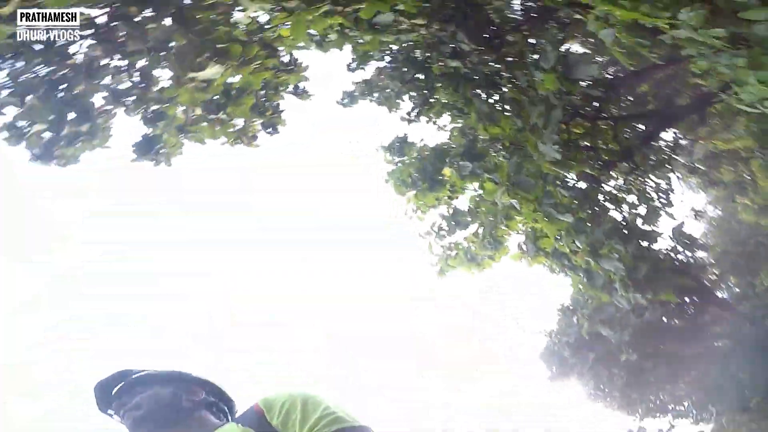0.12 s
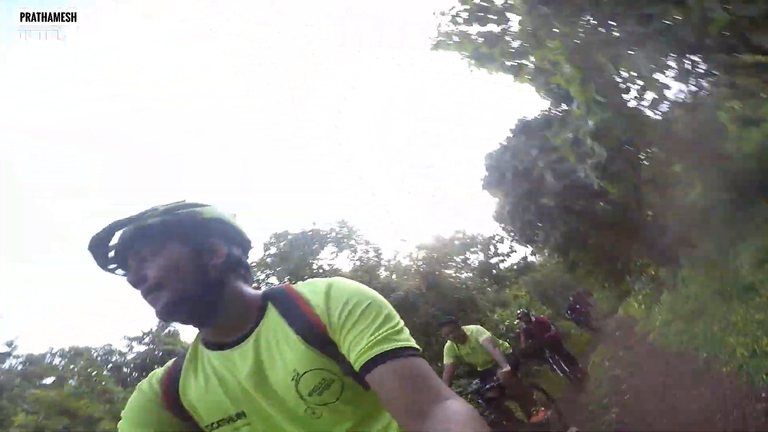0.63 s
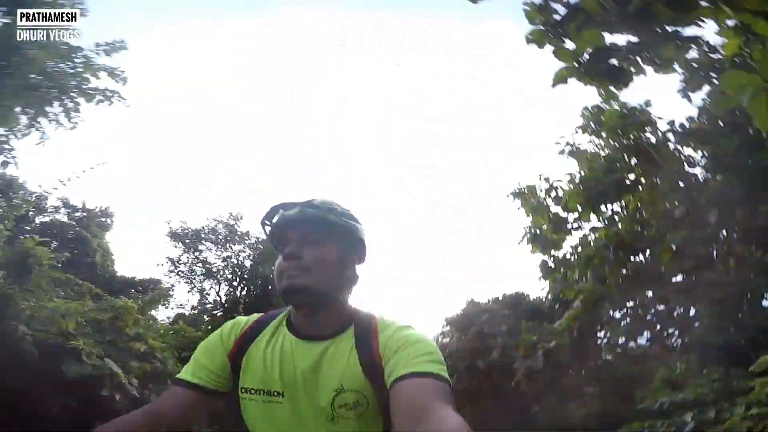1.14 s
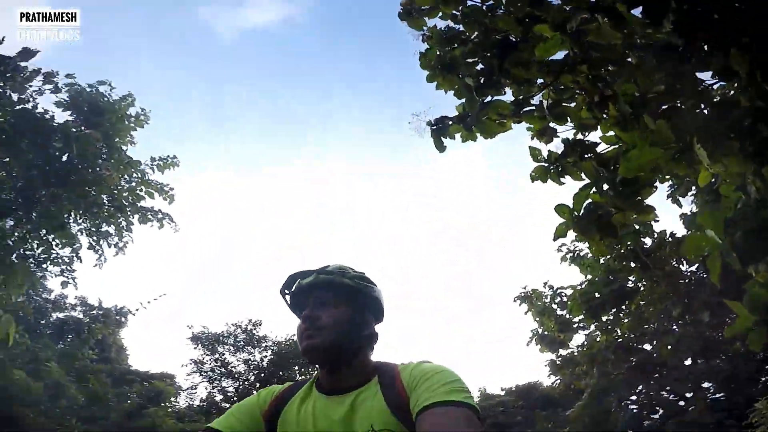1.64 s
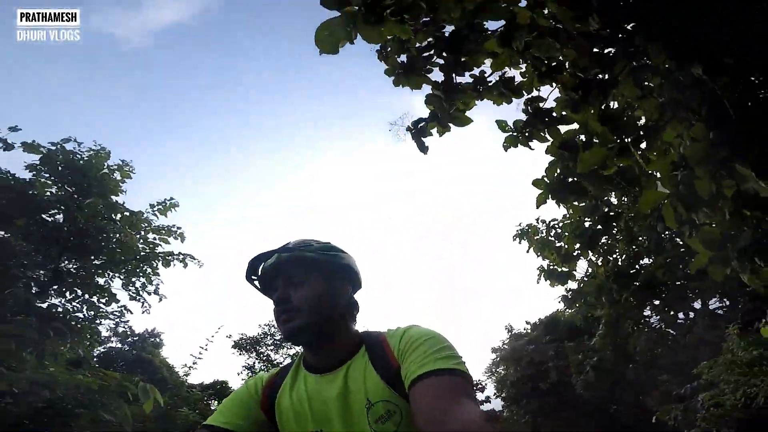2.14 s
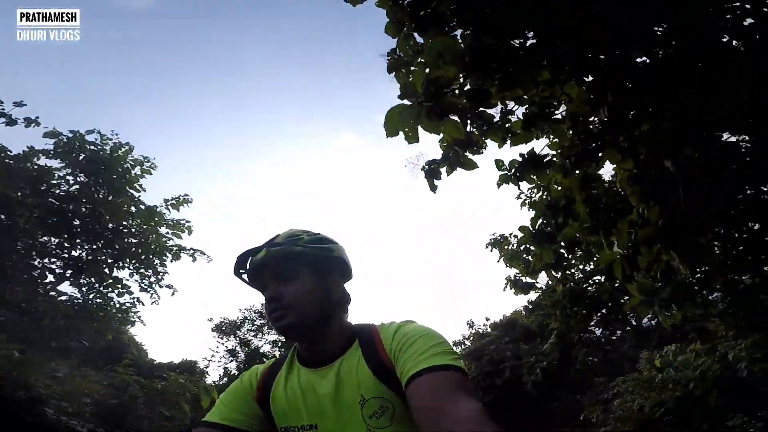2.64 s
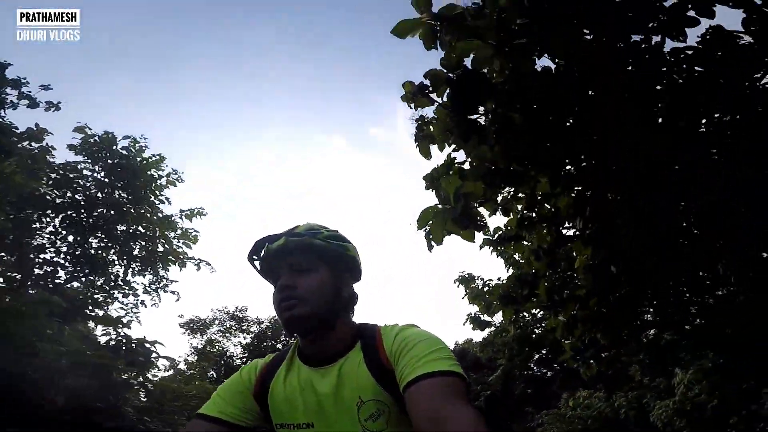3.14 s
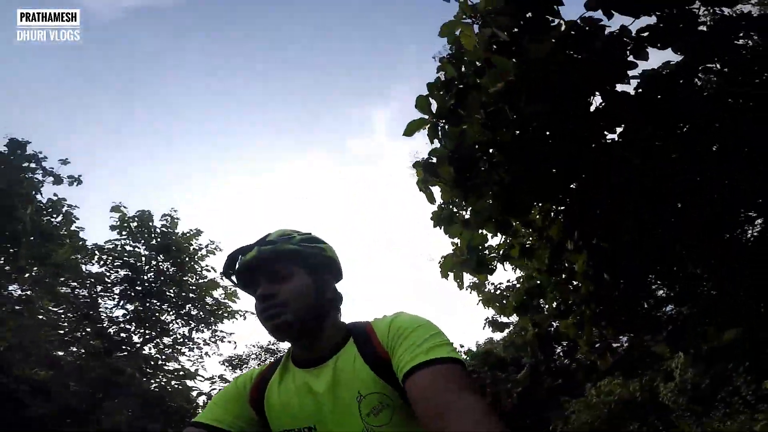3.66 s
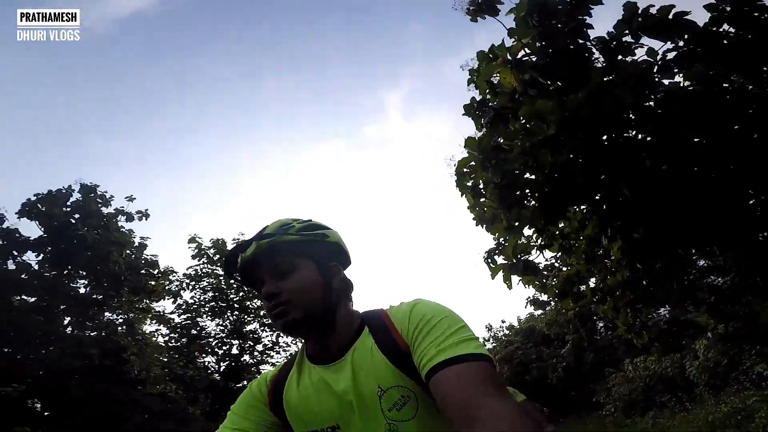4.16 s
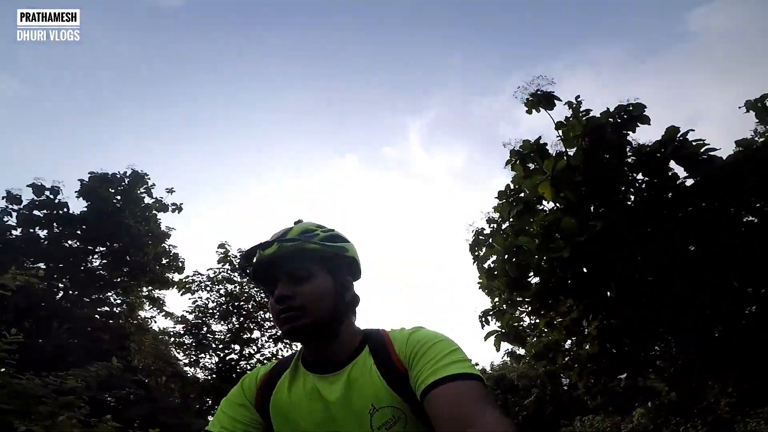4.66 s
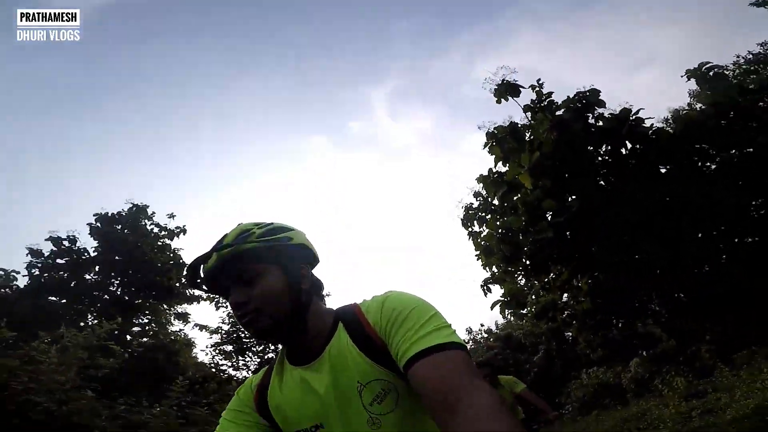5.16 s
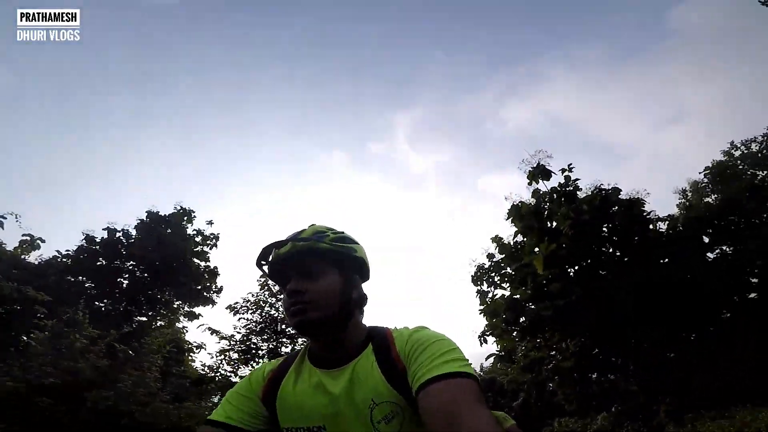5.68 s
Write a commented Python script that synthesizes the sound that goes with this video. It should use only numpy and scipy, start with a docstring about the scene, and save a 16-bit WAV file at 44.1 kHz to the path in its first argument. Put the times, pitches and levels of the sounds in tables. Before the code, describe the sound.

A handlebar-mounted camera clatters and thuds irregularly as a bike bumps along a trail, after brief scraping by a hand, with wind rumbling.

```python
"""Bicycle handlebar on a rough trail

A small camera clamped to the handlebar of a bicycle on a rough dirt trail. Jolts strike damped modes of clamp and
plastic housing and move the two microphones largely in opposite sense; filtered noise makes the wind on the ports;
dense slips make things drag along the housing. Far off, noise bands hiss as an insect chorus and gliding tones
chirp as a bird. Gain control ducks after the loudest knocks."""
import sys
import numpy as np
from scipy import signal
from scipy.fft import rfft, irfft
from scipy.io import wavfile
from scipy.ndimage import uniform_filter1d, minimum_filter1d

SR = 44100
rng = np.random.default_rng(int(sys.argv[2]) if len(sys.argv) > 2 else 0)


def volts_from_decibels(level):
    """Turn decibel levels (scalar or array-like) into linear amplitude factors."""
    exponent = np.asarray(level, float) / 20
    return 10 ** exponent


def log_audio(samples):
    """Write samples as a 16-bit WAV file to the path given in sys.argv[1]."""
    # one column per channel
    frames = np.atleast_2d(samples).T
    # limit to full scale, then quantise
    limited = np.clip(frames, -1, 1)
    pcm = np.round(limited * 32767).astype(np.int16)
    wavfile.write(sys.argv[1], SR, pcm)


N = 255780
TIME = np.arange(N) / SR
SHAPE_TIME = np.arange(1400) / SR  # time within one blow, s


def curve(table):
    """Linear interpolation: columns of a table joined by straight lines in time."""
    s, *columns = np.transpose(table)
    return np.array([np.interp(TIME, s, c) for c in columns])


def unit(x):
    """Normalisation to an rms of 1."""
    return x / np.sqrt(np.mean(x ** 2))


def even(shape):
    """Energy normalisation: every force shape carries the same energy."""
    return shape / np.sqrt(np.sum(shape ** 2, -1, keepdims=True))


def walk(rate):
    """Smoothed random steps: levels held 1 / rate s and slewed twice, rms 1."""
    hold = int(SR / rate)
    steps = np.repeat(rng.standard_normal(N // hold + 1), hold)
    return unit(uniform_filter1d(uniform_filter1d(steps, hold), hold)[:N])


def soften(x, hz):
    """Steep low-pass: a contact takes time, so it drives little above hz."""
    return signal.sosfilt(signal.butter(3, hz, fs=SR, output="sos"), x)


def ring(force, modes, alike_hz=2900):
    """Modal superposition at both microphones; force holds a shared row and one for the right side alone."""
    out = np.zeros((2, N))
    for hz, t60, db, pan_db, lag in modes:
        pole = np.exp(2j * np.pi * hz / SR - np.log(1000) / (t60 * SR))
        own = 1 / (1 + (alike_hz / hz) ** 3)  # short waves reach the two sides by different paths
        right_force = np.sqrt(1 - own) * force[0] + np.sqrt(own) * force[1]
        left, right = signal.lfilter([1], [1, -pole], [force[0], right_force])
        right = right * np.exp(-1j * lag)
        out += volts_from_decibels(db) * np.imag([volts_from_decibels(pan_db / 2) * left, volts_from_decibels(-pan_db / 2) * right])
    return out


def blows(at_s, db, shape):
    """Superposition of impulses: a force shape (blows x 2 x samples) laid at every time."""
    force = np.zeros((2, N + SR))
    at = (at_s * SR).astype(int)[:, None] + np.arange(shape.shape[-1])
    for side in range(2):
        np.add.at(force[side], at, volts_from_decibels(db)[:, None] * shape[:, side])
    return force[:, :N]


def whistles(table, waver_hz):
    """Frequency modulation: short tones that glide, their pitch unsteady by waver_hz."""
    out = np.zeros(N)
    for s, length, from_hz, to_hz, db in table:
        u = np.clip((TIME - s) / length, 0, 1)
        cycles = np.cumsum(from_hz + (to_hz - from_hz) * u + waver_hz) / SR
        swell = np.sqrt(np.clip(4 * u * (1 - u), 0, 1))
        out += volts_from_decibels(db) * swell * np.sin(2 * np.pi * cycles)
    return out


# wind on the ports: (time [s], level of the two ports' mean [dB], left minus right [dB])
WIND = [(0.0, -37.5, 4.5), (0.05, -30.5, -2), (0.14, -44, -2), (0.31, -26, -5), (0.48, -47.5, 0),
        (0.56, -27, 5.5), (0.76, -34.5, 5.5), (0.93, -21.5, 2.5), (0.97, -28.5, 0.5), (1.42, -23, 4.5),
        (1.48, -32.5, 2), (1.71, -20.5, 2.5), (1.79, -30, 5), (2.81, -26, 4), (2.86, -26.5, 3),
        (3.0, -24, 7), (3.18, -29.5, 6), (3.89, -27.5, -1), (4.7, -33.5, 1.5), (5.09, -24.5, 0),
        (5.15, -37.5, 2.5), (5.19, -28, 5), (5.8, -26.5, 3.5)]
# spectral density of the wind: (frequency [Hz], density [dB per Hz])
WIND_COLOUR = [(19, -22), (48, -8.5), (70, 0), (100, -4), (150, -9), (220, -32.5), (420, -34), (900, -58.5),
               (3000, -79)]
# low modes of the clamp: (frequency [Hz], t60 [s], level [dB], left minus right [dB], lag of the right [rad])
CLAMP_MODES = [(128.9, .2, -0.5, 4.5, 3.2), (175.65, 0.36, 0, 4.5, 3.37)]
# low sway of the handlebar: (frequency [Hz], t60 [s], level [dB], left minus right [dB], lag of the right [rad])
BAR_MODES = [(70.6, 0.13, -1, 5, 2.87)]


def wind():
    """Turbulent pressure: low buffeting, partly opposite on the two ports, also shaking clamp and handlebar."""
    hz, db = np.transpose(WIND_COLOUR)
    bins_hz = np.arange(N // 2 + 1) * SR / N
    colour = volts_from_decibels(np.interp(np.log(bins_hz + 1), np.log(hz), db))
    a, b = (unit(irfft(rfft(rng.standard_normal(N)) * colour, N)) for _ in range(2))
    opposite = 0.6  # correlation of the ports, taken negative
    ports = np.array([a, np.sqrt(1 - opposite ** 2) * b - opposite * a])

    level_db, pan_db = curve(WIND)
    flutter_db = 3.5 * walk(18) + 1.95 * np.array([walk(7), walk(7)])
    gusts = volts_from_decibels(level_db + np.array([pan_db, -pan_db]) / 2 + flutter_db)

    shake = unit(ring(soften(rng.standard_normal((2, N)), 230) * gusts.mean(0), CLAMP_MODES))
    sway_force = soften(rng.standard_normal((2, N)), 130) * volts_from_decibels(level_db + 5 * walk(7))
    sway = ring(sway_force, BAR_MODES)
    sway = sway * gusts.mean() / sway.std()
    return gusts * ports / ports.mean(0).std() + volts_from_decibels(3.0) * sway + volts_from_decibels(-34.5) * shake


# deep heave of the air on the ports, below the buffeting: (time [s], level [dB])
HEAVE = [(0.0, -54), (0.23, -39), (0.76, -47), (0.81, -28), (1.19, -27), (1.45, -16.5), (1.5, -18.5),
         (1.57, -23), (2.44, -34), (3.1, -22.5), (3.13, -42), (3.39, -36), (3.44, -17.5), (3.54, -43.5),
         (4.07, -27.5), (4.13, -52), (4.36, -23.5), (4.41, -46.5), (5.06, -22.5), (5.17, -34), (5.78, -32),
         (5.8, -44.5)]


def heave():
    """Infrasonic-to-low pressure swells: narrow-band noise, partly opposite on the two ports."""
    band = signal.butter(2, [18, 52], "band", fs=SR, output="sos")
    a, b = signal.sosfilt(band, rng.standard_normal((2, N)))
    ports = np.array([a + 1.23 * b, a - 1.1 * b])
    return volts_from_decibels(curve(HEAVE)) * ports / a.std()


# insect chorus, its level sinking in steps and partly recovering: (time [s], level [dB])
CHORUS = [(0.0, -63.5), (0.76, -53.5), (1.74, -67.5), (2.91, -66), (3.16, -73.5), (3.81, -77), (4.3, -85),
          (5.09, -73.5), (5.8, -75)]
# its hissing bands: (centre frequency [Hz], width [Hz], level [dB])
CHORUS_BANDS = [(3757, 620, -5.5), (6150, 2900, -8.5), (7580, 1000, -3), (9040, 1600, -14)]


def chorus():
    """Incoherent summation: many insects blur to hissing bands that throb a little."""
    out = 0
    for hz, width, db in CHORUS_BANDS:
        band = signal.butter(3, [hz - width / 2, hz + width / 2], "band", fs=SR, output="sos")
        hiss = unit(signal.sosfilt(band, rng.standard_normal((2, N))))
        out = out + volts_from_decibels(db + 3.0 * walk(55)) * hiss
    return volts_from_decibels(curve(CHORUS)) * out


# drags along the housing, first by a hand, later perhaps by a cable: (start [s], length [s], level [dB])
STROKES = [(0.029, 0.046, -37.5), (0.107, 0.034, -32.5), (0.145, 0.16, -22.5), (0.306, 0.08, -31.5),
           (0.387, 0.2, -47), (0.552, 0.04, -24), (0.605, 0.15, -45.5), (0.734, 0.063, -34.5),
           (0.812, 0.041, -26.5), (0.862, 0.39, -47.5), (1.014, 0.018, -22), (1.128, 0.032, -32),
           (1.672, 0.13, -36.5), (1.84, 0.15, -43), (3.422, 0.089, -38), (4.057, 0.025, -21.5),
           (4.314, 0.086, -45), (4.964, 0.13, -44), (5.332, 0.13, -39.5)]
STROKE_EDGE_S, HAND_OFF_S = 0.024, 0.95
CHATTER_DB, CHATTER_FADE_S, CHATTER_FLOOR_DB = -26, 0.021, -51  # loose parts buzz on after each knock


def rubbing():
    """Stick-slip friction on the four mode sets: dense fine slips, and small loose ticks once the hand lets go."""
    drag = 0
    for s, length, db in STROKES:
        inside_s = np.minimum(TIME - s, s + length - TIME)
        drag = drag + volts_from_decibels(db) * np.clip(inside_s / STROKE_EDGE_S + 0.5, 0, 1)
    chatter = 0
    for s, crack_db, *_ in KNOCKS:
        fade = (TIME > s) * np.exp(-np.abs(TIME - s) / CHATTER_FADE_S)
        chatter = chatter + volts_from_decibels(crack_db + CHATTER_DB) * fade

    slips = rng.standard_normal((2, N)) * volts_from_decibels(3.67 * walk(300))
    tick_db = 13.5 + 5 * np.minimum(rng.exponential(size=N), 1.8)
    ticks = (rng.random(N) < 200 / SR) * (TIME > HAND_OFF_S) * volts_from_decibels(tick_db)  # 200 per second on average
    rough = slips + ticks * rng.standard_normal((2, N))
    friction = (drag + chatter) * rough + volts_from_decibels(CHATTER_FLOOR_DB) * slips
    # (level dB, low-pass Hz) of the force on shell, bright, thud and clamp modes
    drives = [(-27.5, 2000), (-39.5, 7100), (-32.5, 500), (-29.5, 290)]
    return np.array([volts_from_decibels(db) * soften(friction, hz) for db, hz in drives])


# knocks: (time [s], crack [dB], brightness above 1.7 kHz against the crack [dB], thud [dB])
KNOCKS = [(0.105, -30.5, -29, -33.5), (0.28, -23.5, -19, -27.5), (0.298, -24, -22, -53),
          (0.362, -45, -8.5, -35), (0.547, -31.5, -34, -33), (0.57, -32.5, -17, -28.5),
          (0.832, -34, -21, -35), (0.865, -36, -16.5, -34), (0.926, -26, -16, -26),
          (1.007, -31, -34, -23.5), (1.017, -14, -19.5, -24), (1.03, -40, -21, -22.5),
          (1.051, -46, -16, -31.5), (1.133, -36.5, -23, -34.5), (1.149, -30.5, -20.5, -32.5),
          (1.183, -26, -26, -19.5), (1.289, -28.5, -15, -38), (1.424, -42, -12, -21.5),
          (1.435, -16.5, -16, -42), (1.473, -9, -14.5, -10.5), (1.548, -56, -7, -32),
          (1.597, -30.5, -27, -30), (1.624, -21, -27.5, -59), (1.68, -38, -27, -21),
          (1.696, -28, -19.5, -29), (1.726, -12, -31, -14), (1.745, -8, -20, -14), (1.759, -7.5, -17, -8),
          (1.827, -25.5, -18, -32), (1.926, -38.5, -32, -28), (1.978, -27, -22, -25),
          (2.197, -43.5, -25, -28), (2.252, -34.5, -23, -56), (2.412, -18, -19.5, -30),
          (2.441, -17, -13.5, -17), (2.471, -36, -26, -26), (2.523, -30.5, -16, -41),
          (2.635, -26, -19.5, -17), (2.661, -33, -25, -23), (2.844, -11, -19.5, -6),
          (2.946, -32, -18.5, -44), (3.081, -32, -14, -31.5), (3.101, -15.5, -19.5, -19),
          (3.144, -49, -35, -27), (3.205, -15, -9.5, -15), (3.214, -27, -39, -22.5),
          (3.226, -28.5, -17, -26), (3.239, -29.5, -19, -26), (3.306, -17, -14, -19.5),
          (3.344, -27.5, -25, -21.5), (3.358, -31.5, -17, -26.5), (3.384, -29.5, -16.5, -37),
          (3.409, -52.5, -9, -34), (3.436, -24.5, -34.5, -24.5), (3.461, -23.5, -15, -20),
          (3.47, -24, -16, -22.5), (3.492, -18.5, -17.5, -17.5), (3.547, -23, -20, -14.5),
          (3.564, -27.5, -19.5, -30), (3.659, -28.5, -22, -26), (3.713, -31.5, -19, -23),
          (3.726, -23, -23, -17.5), (3.81, -22.5, -11, -23), (3.821, -22.5, -28, -30),
          (3.859, -18, -18.5, -22.5), (3.9, -28, -19, -26), (3.916, -24, -17.5, -21),
          (4.017, -44, -15, -29.5), (4.025, -31, -25, -30), (4.057, -18, -20.5, -15),
          (4.074, -11, -9, -9.5), (4.086, -22, -15, -36), (4.099, -20, -16.5, -17.5),
          (4.141, -25, -17.5, -29), (4.163, -29, -26, -25.5), (4.176, -33.5, -20, -24.5),
          (4.216, -22, -19, -27), (4.243, -48.5, -14, -41), (4.3, -28.5, -19, -34),
          (4.333, -37, -25, -29.5), (4.347, -25.5, -14, -26.5), (4.361, -25, -17.5, -19),
          (4.373, -29.5, -32, -28), (4.393, -20, -20.5, -24.5), (4.439, -43, -27, -28.5),
          (4.569, -28, -19.5, -21.5), (4.603, -39.5, -1.5, -45), (4.74, -44, -13, -60),
          (4.801, -23.5, -18.5, -21), (4.867, -20, -19, -26), (4.878, -25.5, -21, -21.5),
          (4.939, -24.5, -22, -25), (4.982, -26, -26, -23.5), (5.001, -21.5, -14.5, -48),
          (5.041, -53, -18, -29), (5.075, -25, -23, -25.5), (5.088, -23, -46, -27.5),
          (5.101, -14, -16.5, -17), (5.28, -27.5, -19, -19), (5.332, -21.5, -19.5, -25.5),
          (5.367, -27.5, -28, -25), (5.385, -16, -13.5, -13.5), (5.436, -28.5, -21, -24),
          (5.444, -30, -19.5, -32), (5.455, -34, -24, -24), (5.485, -17, -15.5, -18.5),
          (5.531, -37.5, -27, -28.5), (5.678, -33.5, -21.5, -27.5), (5.774, -16.5, -20.5, -17)]
# jolts that set the clamp swinging: (time [s], level [dB])
SWINGS = [(0.025, -30), (0.116, -21.5), (0.161, -19.5), (0.258, -13.5), (0.379, -16), (0.551, -7.5),
          (0.836, -20), (0.925, -14.5), (1.021, -16), (1.128, -17.5), (1.182, -18), (1.426, -18.5),
          (1.48, -19), (1.598, -17.5), (1.996, -22), (2.446, -14.5), (2.477, -24.5), (2.633, -23.5),
          (3.105, -20), (3.21, -15.5), (3.314, -16), (3.473, -19), (3.552, -19), (3.738, -13),
          (3.814, -17.5), (3.861, -19), (4.019, -18.5), (4.061, -18.5), (4.224, -17.5), (4.36, -15.5),
          (4.982, -17.5), (5.079, -20.5), (5.283, -16), (5.361, -14.5)]


def knocks():
    """Impact excitation of the four mode sets: a hard contact with a gritty tail, then a softer push behind it."""
    at, crack_db, bright_db, thud_db = np.transpose(KNOCKS)
    swing_at, swing_db = np.transpose(SWINGS)
    t = SHAPE_TIME
    grit = rng.standard_normal((len(KNOCKS), 2, len(t))) * np.minimum(t / 0.00072, 1)
    rebounds = rng.random((len(KNOCKS), 1, len(t))) < 420 / SR  # loose parts land again just after
    tail = (volts_from_decibels(-24.5) + volts_from_decibels(3.5) * rebounds) * np.exp(-t / 0.0084)
    contact = grit * (np.exp(-t / 0.0021) + tail)
    contact = contact + volts_from_decibels(6.5) * (t > 0) * np.exp(-t / 0.0001)  # the first touch is a clean edge

    push = np.ones((1, 2, 1)) * t * np.exp(-t / 0.00052)
    push = push / push.sum(-1, keepdims=True)
    shove = volts_from_decibels(9.5) * push + volts_from_decibels(-6.5) * even(soften(grit * np.exp(-t / 0.0079), 640))

    spark_gain = volts_from_decibels(-4.0 + 0.5 * bright_db)[:, None, None]  # brighter knocks start more sharply
    spark = spark_gain * even(grit * np.exp(-t / 0.00013))
    crack = blows(at, crack_db, even(soften(contact, 1930)))
    snap = blows(at, crack_db + bright_db, even(soften(contact, 4100)) + spark)
    thud = blows(at + 0.0015, thud_db, shove)
    swing = blows(swing_at, swing_db, volts_from_decibels(8.5) * soften(push, 400))
    return np.array([volts_from_decibels(-3.5) * crack, volts_from_decibels(4.5) * snap, thud, swing])


# modes of clamp and housing, from dull to bright:
# (frequency [Hz], t60 [s], level [dB], left minus right [dB], lag of the right [rad])
THUD_MODES = [(267.5, 0.014, 5.5, 6.5, 2.14), (326, 0.021, -3.5, 8, 4.33), (388.3, 0.076, -10, 1.5, 2.89),
              (555, 0.029, -2.5, -1, 2.44)]
SHELL_MODES = [(662, 0.048, -4, -3.5, 3.25), (835, 0.0027, -16.5, -14.5, 2.83),
               (899, 0.023, 1.5, -1, 3.292), (1139, 0.018, 4, 0.5, 2.66), (1600, 0.0071, -7.5, 22, 2.2)]
BRIGHT_MODES = [(1768, 0.016, 4.5, 2.5, 3.17), (2252, 0.012, 2.5, 2, 4.24), (2630, 0.0042, -9.5, 23.5, 10),
                (3000, 0.012, -10.5, 1, 4.5), (3680, 0.0016, -0.5, 9.5, 14), (5870, 0.0014, 4, -7.5, 5.07),
                (6700, 0.0012, 4.5, -6, 3.03)]


def housing():
    """Forced modal vibration: knocks and rubbing drive the same modes of clamp and housing."""
    mode_sets = [SHELL_MODES, BRIGHT_MODES, THUD_MODES, CLAMP_MODES]
    return sum(ring(force, modes) for force, modes in zip(knocks() + rubbing(), mode_sets))


# resonances that slide while something drags along the housing:
# (start [s], length [s], from [Hz], to [Hz], level [dB])
SLIDES = [(0.16, 0.11, 1900, 2000, -31.5), (0.247, .06, 2300, 2500, -34), (0.144, 0.14, 3020, 3080, -43),
          (0.16, 0.082, 540, 730, -27), (0.135, 0.14, 630, 720, -29.5), (0.27, 0.082, 2000, 1700, -44),
          (0.1, 0.07, 390, 390, -27.5), (0.251, 0.164, 390, 412, -25.5), (.14, .14, 5780, 5820, -51),
          (0.555, 0.046, 2200, 2520, -33.5), ]
SLIDE_WIDTH = 0.056  # low-pass of the roughness, as a share of the starting pitch


def slides(tremble):
    """Amplitude modulation by noise: each gliding tone roughens into a narrow band."""
    out = np.zeros(N)
    for row in SLIDES:
        from_hz = row[2]
        roughness = 0.5 + unit(soften(rng.standard_normal(N), SLIDE_WIDTH * from_hz))
        out += whistles([row], 0.0297 * from_hz * tremble) * roughness
    return out


# chirps of a bird: (start [s], length [s], from [Hz], to [Hz], level [dB])
CHIRPS = [(.612, 0.041, 3990, 3380, -42.5), (.695, 0.035, 4000, 3380, -46.5), (.803, 0.02, 3930, 3630, -51),
          (.88, 0.018, 3880, 3470, -50), (1.233, 0.016, 3900, 3600, -55), (1.31, 0.021, 3900, 3620, -51),
          (1.392, 0.016, 3880, 3680, -49.5)]
CHIRP_WAVER_HZ = 45


def bird(tremble):
    """Frequency-swept tones through the air, unequal in level and arrival time at the two microphones."""
    chirps = whistles(CHIRPS, CHIRP_WAVER_HZ * tremble) * volts_from_decibels(1.8 * walk(150))
    return np.array([chirps / 2, np.roll(chirps, 3)])  # the right is 3 samples later


# heavy bumps that flex the mount; where it is struck sets the pitch: (time [s], level [dB], flex [Hz])
BUMPS = [(0.865, -19, 390), (1.02, -15, 1130), (1.033, -16, 249), (1.438, -11, 1096), (2.412, -16.5, 1120),
         (3.144, -25, 405), (4.394, -20, 930), (0.92, -19, 416), (1.005, -16, 311), (1.138, -12, 410),
         (1.182, -20, 406), (1.241, -16.5, 396), (1.425, -10.5, 418), (1.474, -11.5, 358),
         (1.599, -13.5, 417), (1.921, -18.5, 400), (1.978, -8.5, 271), (2.636, -12, 249),
         (2.848, -2.5, 261), (3.205, -20.5, 317), (3.308, -15, 370), (3.549, -9.5, 298), (3.723, -14, 315),
         (3.811, -12, 563), (3.861, -15, 536), (4.057, -19, 229), (4.219, -15, 543), (4.348, -11.5, 391),
         (4.571, -15.5, 277), (4.982, -12.5, 406), (5.385, -12, 378), (5.487, -10, 278),
         (5.776, -14.5, 273)]
BUMP_CYCLES = 2.8  # swings until the flex has faded to about a third


def bumps():
    """Damped oscillation as a force: each bump pushes the mount back and forth a few times."""
    at, db, hz = np.transpose(BUMPS)
    hz = hz[:, None, None]
    flex = np.sin(2 * np.pi * hz * SHAPE_TIME) * np.exp(-SHAPE_TIME * hz / BUMP_CYCLES)
    flex = flex * np.ones((1, 2, 1))
    return ring(blows(at, db - 18, even(flex)), THUD_MODES + SHELL_MODES)


# thin squeaks, perhaps a brake pad grazing its disc; the short glides at 1.624, 3.433 and 3.451 s are
# resonances sliding as something drags along the housing: (start [s], length [s], from [Hz], to [Hz], level
# [dB])
SQUEAKS = [(2.54, 0.39, 2960, 2970, -68), (2.55, 0.36, 2630, 2650, -66), (3.108, 0.13, 721, 710, -36.5),
           (1.624, 0.012, 1540, 1500, -25.5), (3.433, .013, 760, 1284, -21),
           (3.451, .008, 1585, 1840, -22.5), (3.595, 0.06, 1100, 1130, -55),
           (3.748, 0.063, 1110, 1110, -52), (4.272, 0.07, 1120, 1170, -43.5), (4.7, 0.31, 1150, 1150, -57)]
SQUEAK_WAVER_HZ = 22


def squeaks():
    """Tonal friction: thin tones of unsteady pitch and level."""
    return whistles(SQUEAKS, SQUEAK_WAVER_HZ * walk(56)) * volts_from_decibels(3.5 * walk(120))


def scene():
    """Superposition at both microphones; squeaks and slides come through the housing, the bird through the air."""
    tremble = walk(400)
    tones = squeaks() + slides(tremble)
    through_housing = np.array([tones, -0.16 * tones])
    return wind() + heave() + chorus() + housing() + through_housing + bird(tremble) + bumps()


def follow(peak, release_s):
    """Peak detection with exponential release: jumps up to each peak and sinks back slowly."""
    return np.exp(np.maximum.accumulate(np.log(peak + 1e-9) + TIME / release_s) - TIME / release_s)


def roll_off(x):
    """The treble ends steeply here."""
    return signal.sosfilt(signal.butter(12, 16300, fs=SR, output="sos"), x)


DUCK_ABOVE_DB, DUCK_SHARE = -8, 0.59  # threshold, and share of the excess dB taken away
DUCK_ATTACK_S, DUCK_RELEASE_S, DUCK_HZ = 0.021, 0.081, 523  # it listens above DUCK_HZ
TOP_HZ = 10300


def record(dry):
    """Dynamic compression: gain ducks just behind sharp knocks and recovers; a limiter catches the peaks."""
    high_pass = signal.butter(2, DUCK_HZ, "high", fs=SR, output="sos")
    sharp = np.abs(signal.sosfilt(high_pass, dry)).max(0)
    over = np.log(np.maximum(1, follow(sharp, DUCK_RELEASE_S) / volts_from_decibels(DUCK_ABOVE_DB)))
    lag = np.exp(-1 / (DUCK_ATTACK_S * SR))
    ducking = np.exp(-DUCK_SHARE * signal.lfilter([1 - lag], [1, -lag], over))
    ducked = soften(dry, TOP_HZ) * ducking

    ahead = 200  # samples the limiter looks ahead
    peak = -minimum_filter1d(-np.abs(ducked).max(0), 2 * ahead)
    gain = np.minimum(1, 0.98 / follow(peak, release_s=0.05))
    gain = uniform_filter1d(uniform_filter1d(gain, ahead), ahead)
    mix = np.clip(ducked * gain, -1, 1)
    return roll_off(mix)


dry = scene()
out = record(dry)
log_audio(out)
```